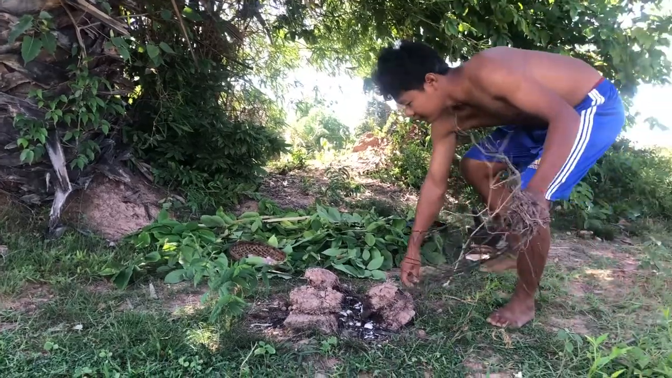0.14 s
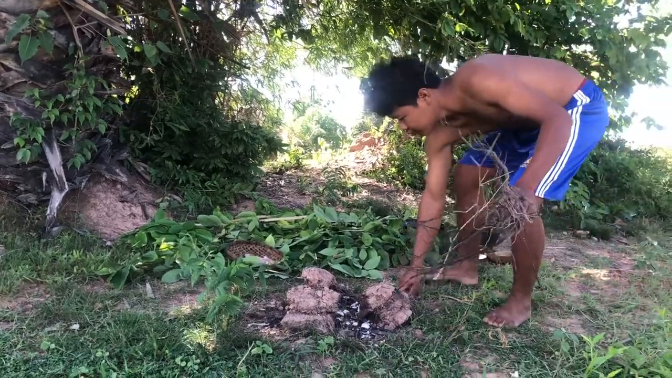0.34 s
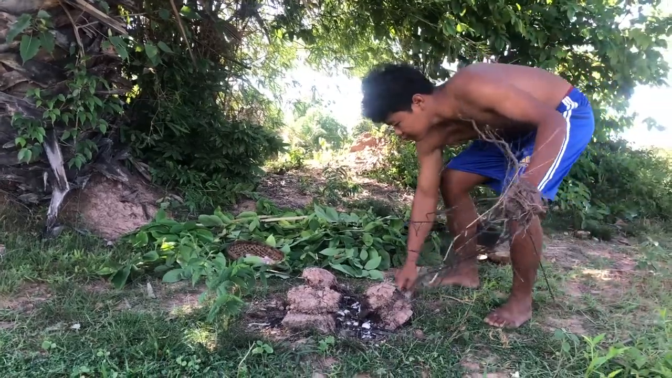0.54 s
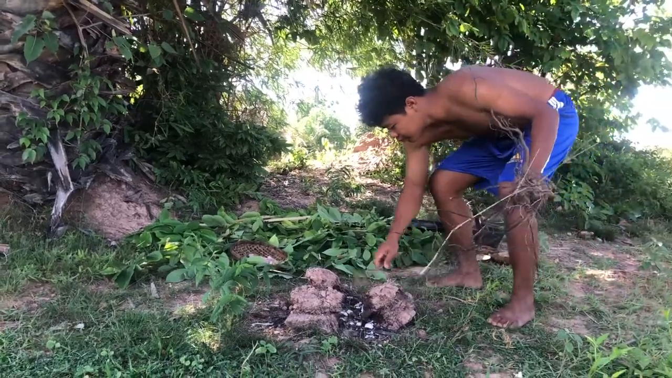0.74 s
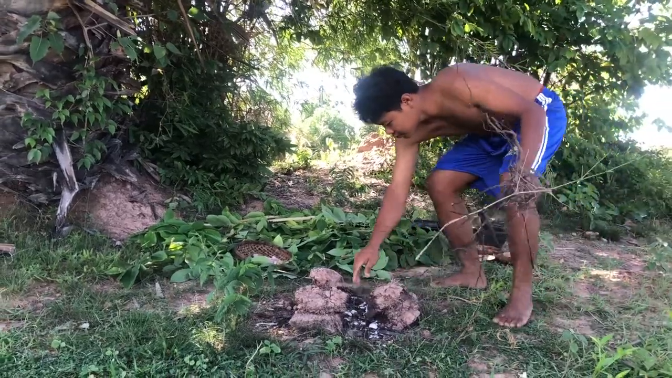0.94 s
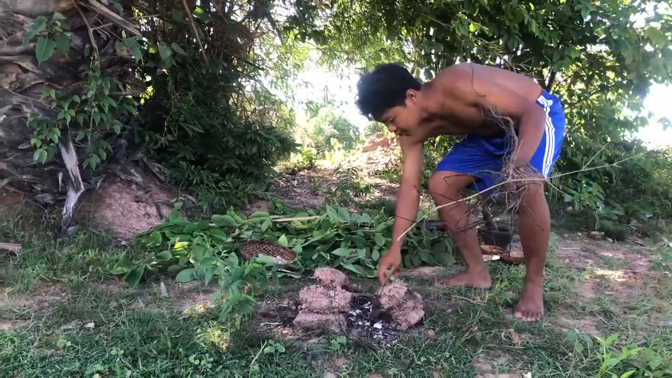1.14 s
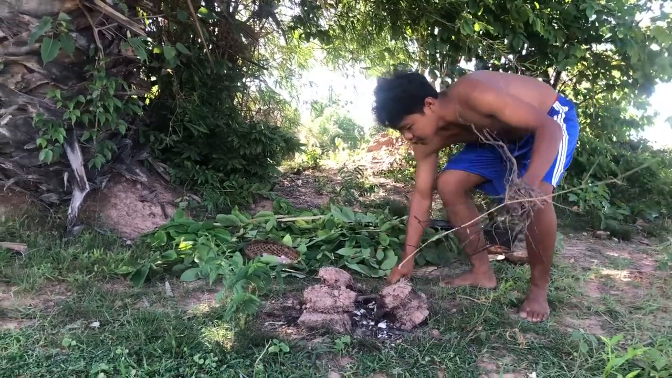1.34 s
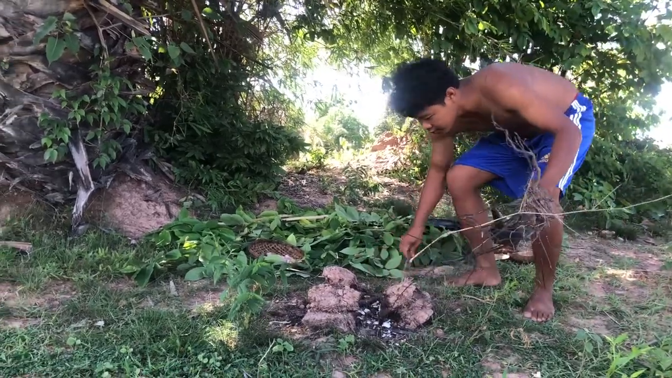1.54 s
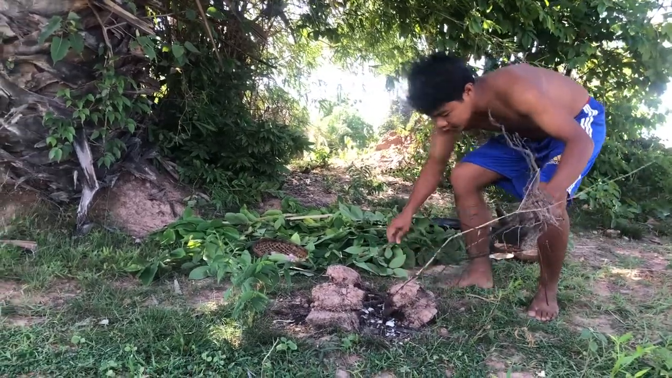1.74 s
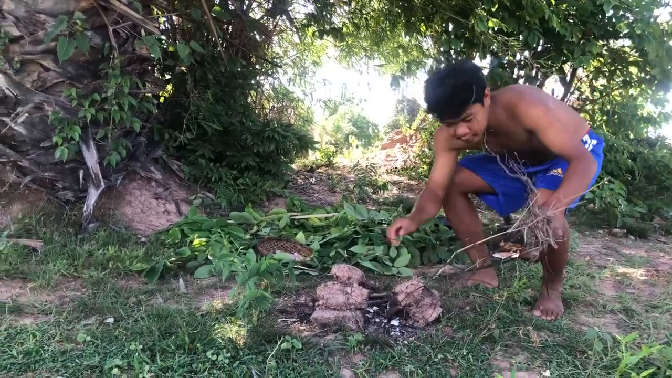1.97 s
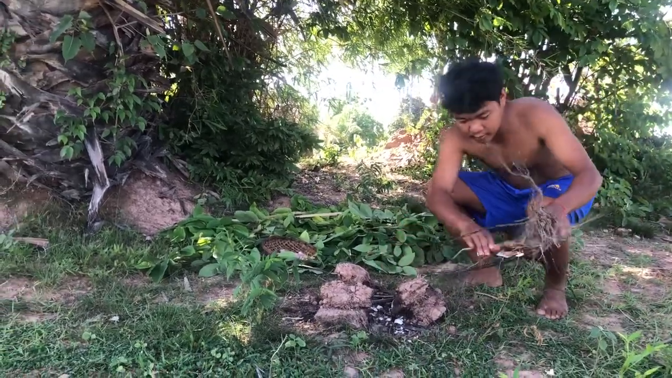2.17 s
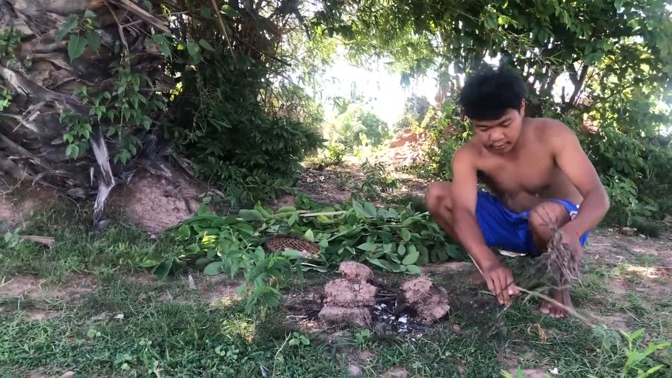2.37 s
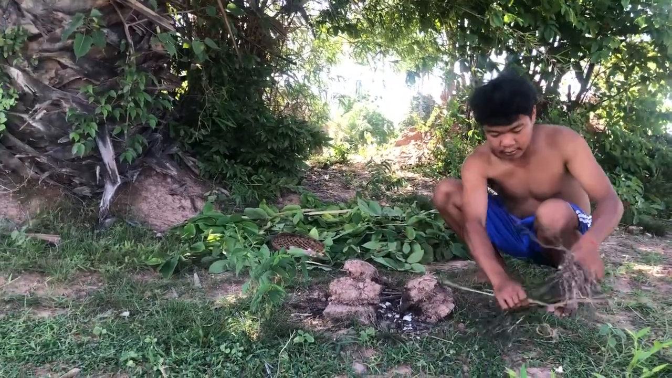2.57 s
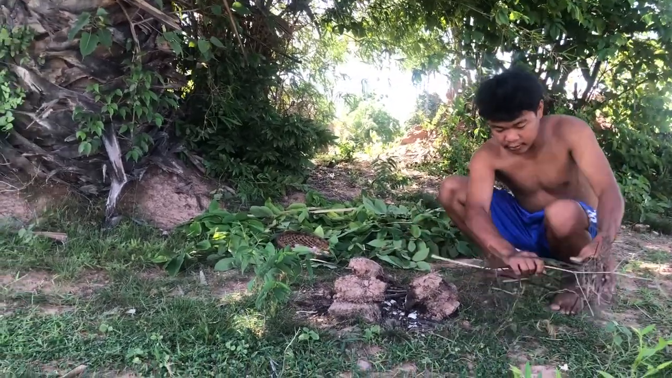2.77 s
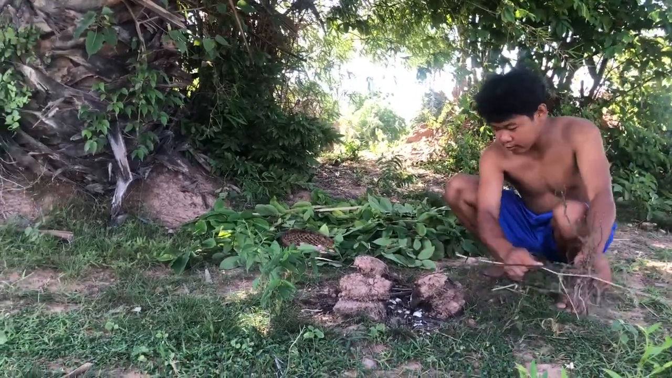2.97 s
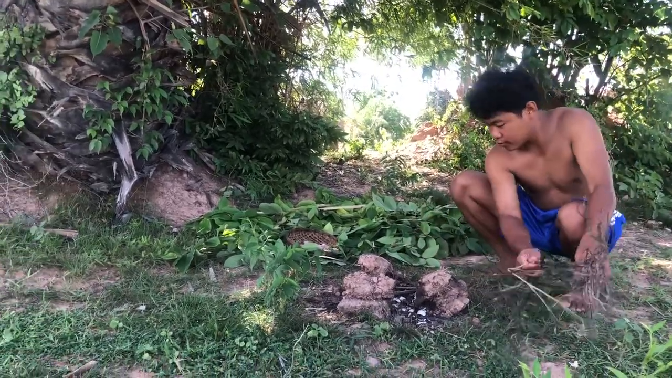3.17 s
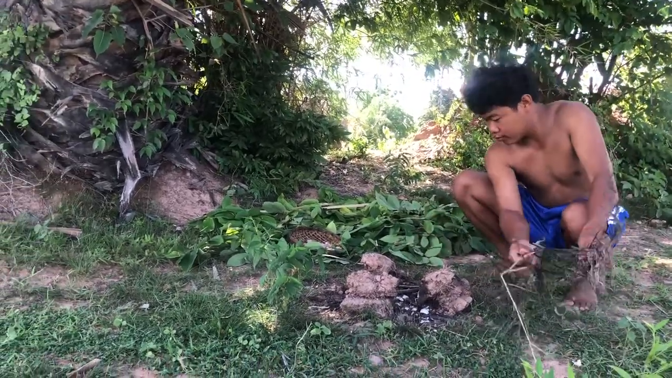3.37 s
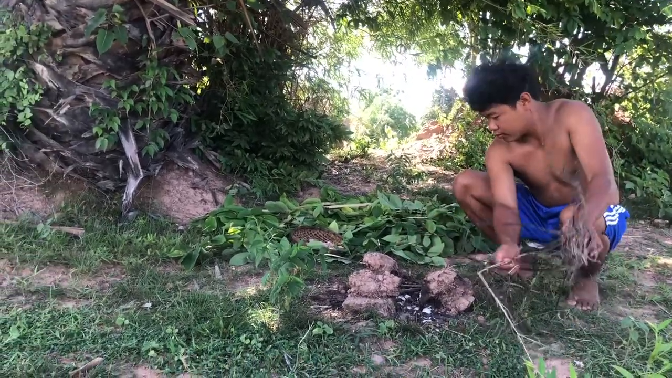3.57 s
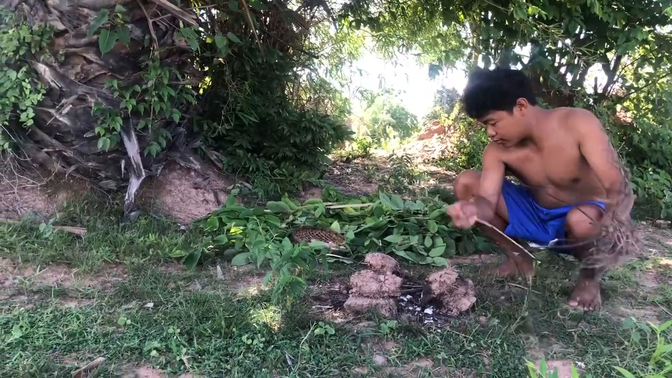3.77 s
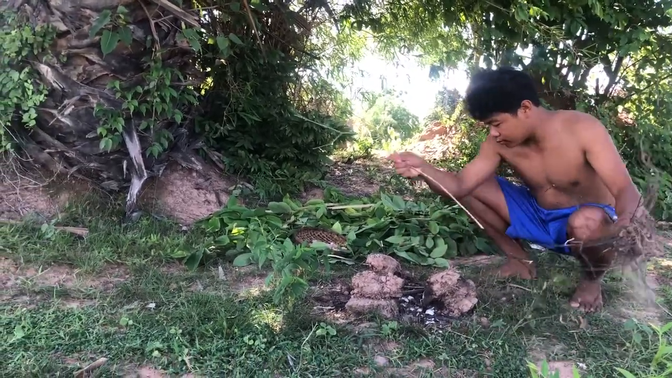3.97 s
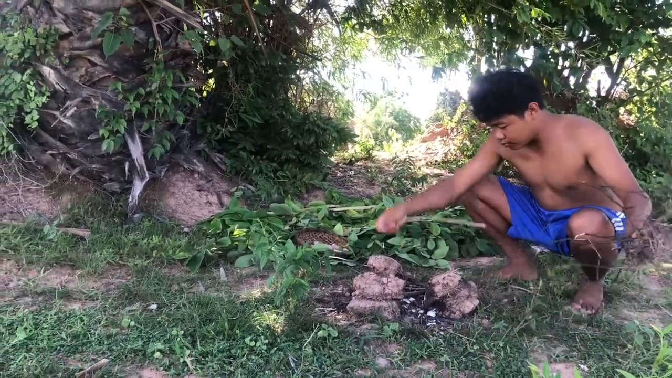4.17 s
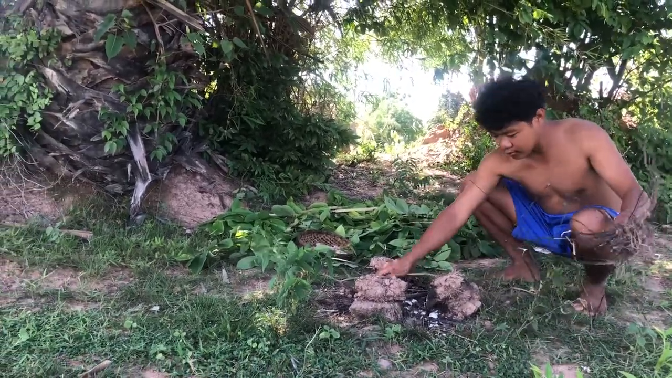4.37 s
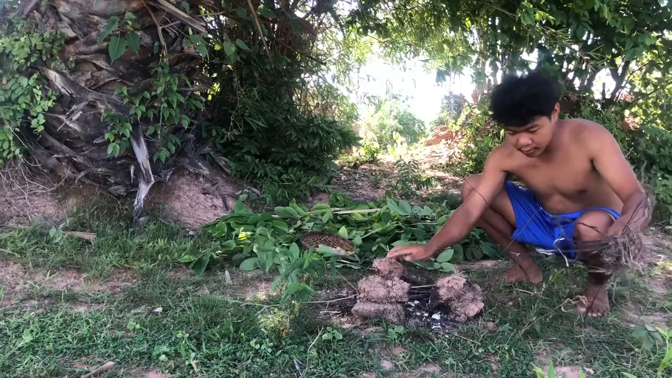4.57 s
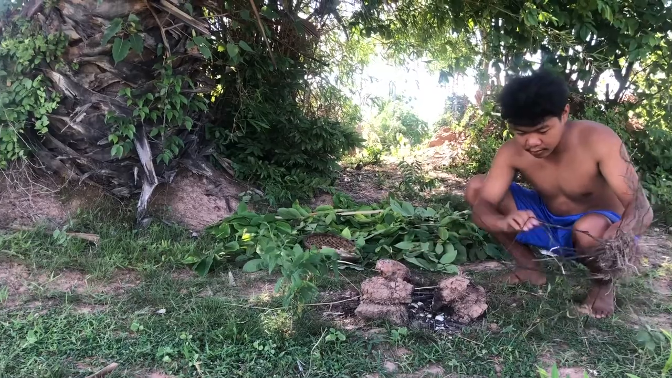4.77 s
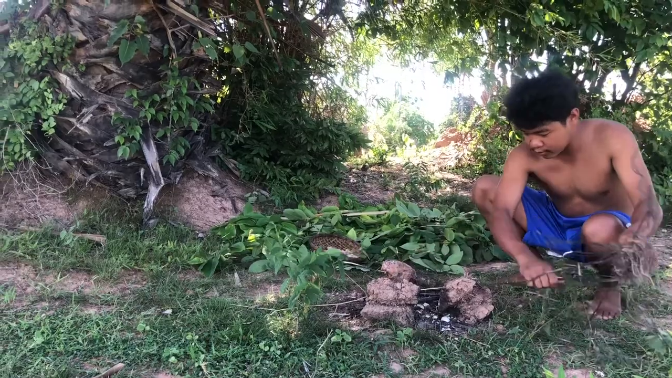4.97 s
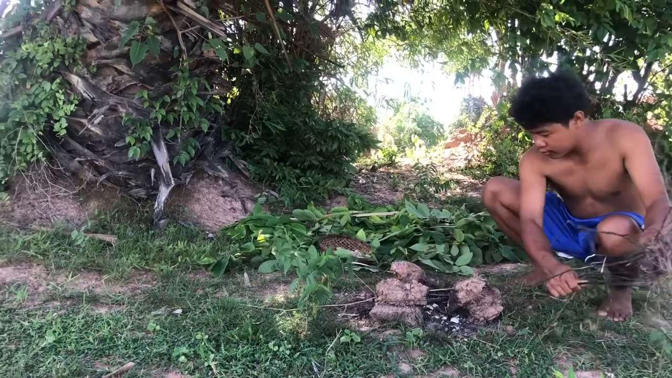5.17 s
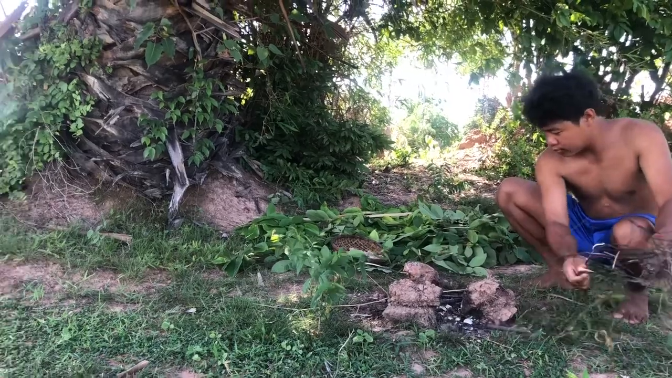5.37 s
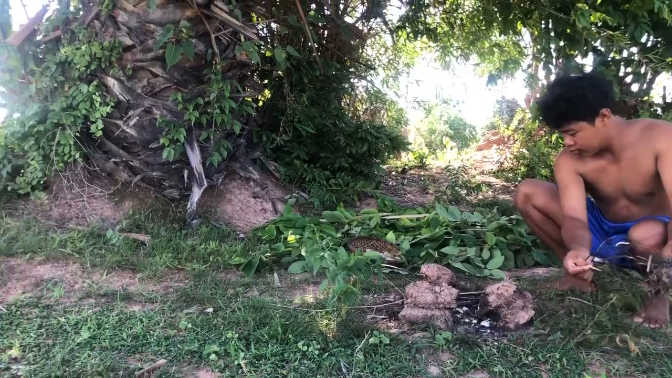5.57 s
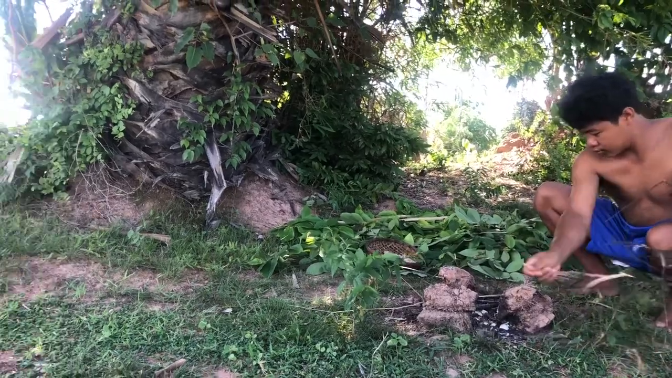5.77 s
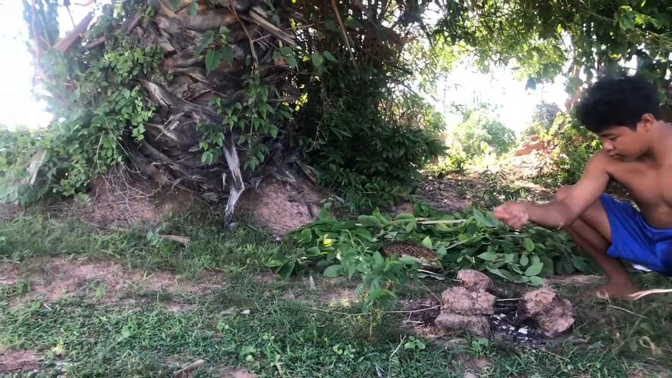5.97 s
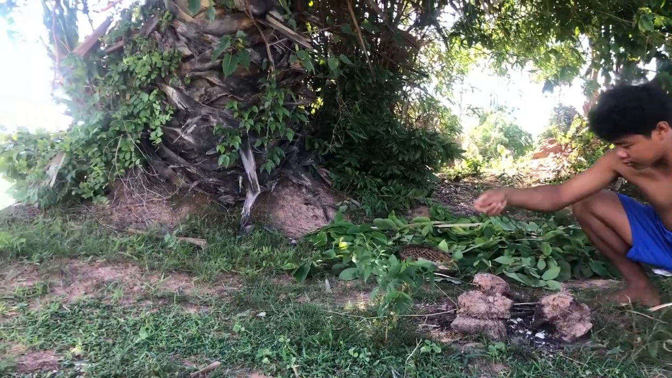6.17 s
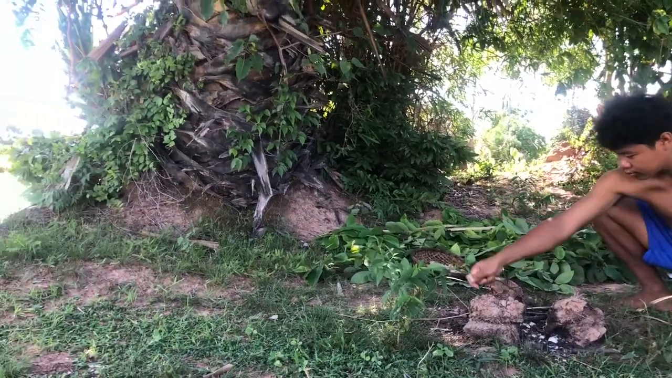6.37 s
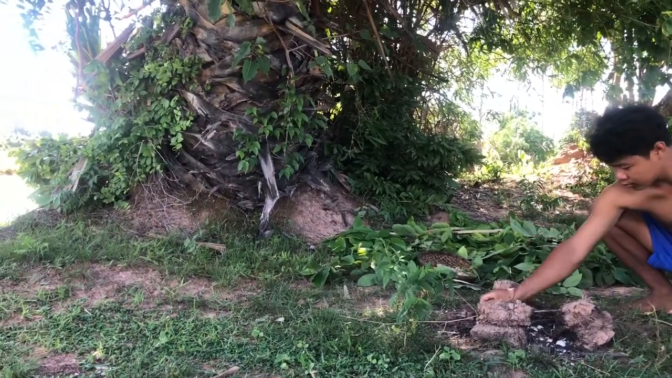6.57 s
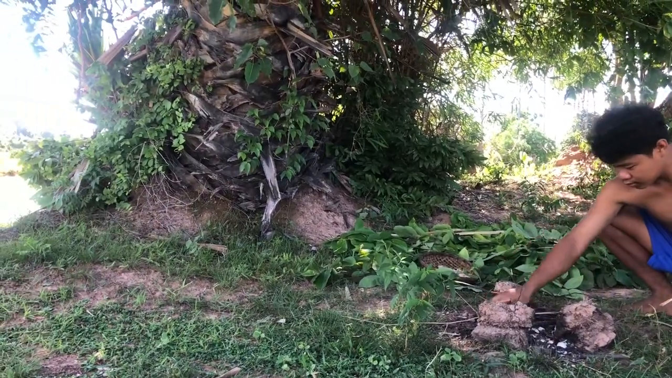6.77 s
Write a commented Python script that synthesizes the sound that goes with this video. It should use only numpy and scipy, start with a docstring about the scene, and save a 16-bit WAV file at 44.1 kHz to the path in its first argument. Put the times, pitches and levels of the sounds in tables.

```python
"""Outdoors by a small stone fireplace, someone crouching handles a bundle of dry twigs and breaks sticks from it.
A low rumble and hum, airy hiss and leaf ticks run throughout, coloured noise with drifting gains; a far rush
dies down early. Grips and pulls soon make the bundle crackle, many tiny slips, and set off snaps, short torn
noise bursts. Ringing sticks tap the stones, thin chirps and damped thuds come between, and faint hoots,
narrow noise, come in later. More soft thuds follow, and one gust swells the wind near the end."""
import sys
import numpy as np
from scipy import signal
from scipy.fft import rfft, irfft, next_fast_len
from scipy.io import wavfile
from scipy.ndimage import uniform_filter1d, map_coordinates

SR = 44100
rng = np.random.default_rng(int(sys.argv[2]) if len(sys.argv) > 2 else 0)


def wav_record(signal):
    """Record a signal, one row per channel, as 16-bit PCM in the file named by sys.argv[1]."""
    frames = np.transpose(np.atleast_2d(signal))
    bounded = np.clip(frames, -1, 1)
    # unit amplitude maps onto the largest positive 16-bit level
    quanta = np.round(bounded * 32767).astype(np.int16)
    wavfile.write(sys.argv[1], SR, quanta)


N = 300321

# grips and pulls on the bundle, levels ahead of the layer trims:
# start_s, length_s, thin_twig_crackle_db, thick_wood_creak_db
BUNDLE_PULLS = [(0.579, 0.053, -68, -59), (0.739, 0.0052, -41, -44), (1.01, 0.0044, -48, -52.5),
                (1.236, 0.043, -65, -66), (1.476, 0.069, -64.5, -63), (1.927, 0.019, -58, -54.5),
                (2.208, 0.078, -49.5, -53), (2.338, 0.018, -54, -53.5), (2.593, 0.12, -53, -55.5),
                (2.834, 0.0069, -48, -48), (3.015, 0.015, -48, -51), (3.038, .03, -41.5, -50),
                (3.128, 0.081, -37, -45), (3.222, 0.088, -49, -55.5), (3.372, 0.0093, -53.5, -59),
                (3.402, 0.061, -49, -52), (3.558, 0.052, -45, -52), (3.601, 0.16, -43.5, -47),
                (3.791, 0.011, -50, -48), (3.832, 0.054, -49, -47.5), (3.928, 0.016, -53, -58),
                (4.031, 0.03, -61, -56), (4.17, 0.018, -59, -77), (4.287, .05, -57, -58.5),
                (4.438, .02, -57, -63), (4.946, 0.021, -48.5, -62), (5.004, 0.038, -41, -53),
                (5.218, 0.0597, -52.5, -56.5), (5.329, 0.0622, -30.5, -48), (5.452, 0.034, -53, -72),
                (5.481, 0.039, -35.5, -50.5), (5.707, 0.033, -42.5, -46), (5.766, .04, -40, -45),
                (5.906, 0.018, -48.5, -57), (5.982, 0.048, -53, -55), (6.277, 0.016, -77, -60),
                (6.484, 0.048, -61, -61), (6.68, 0.024, -78, -59)]
# relative spectrum of wood bending or being struck: frequency_hz, density_db (per Hz)
BENDING_SPECTRUM = [(250, -9.5), (700, -6), (1200, -10.5), (2000, -2.5), (2800, -4), (4200, 0), (6200, -4),
                    (9000, -16.5), (16000, -42)]


def amp(db):
    """Decibels to gain."""
    return 10 ** (np.asarray(db) / 20)


def unit(x):
    """Scale to rms 1."""
    return x / np.sqrt(np.mean(x ** 2) + 1e-20)


def along(points, hz):
    """Read (frequency_hz, value) points on a log frequency axis."""
    f, v = np.transpose(points)
    return np.interp(np.log(hz + 1), np.log(f + 1), v)


def noise():
    """White noise for the whole scene."""
    return rng.standard_normal(N)


def wobble(rate):
    """A smooth random curve with this many knots a second."""
    knots = rng.standard_normal(int(N * rate / SR) + 4)
    return map_coordinates(knots, [np.arange(N) * rate / SR])


def filtered(x, response):
    """Multiply the spectrum of x by a function of frequency."""
    m = next_fast_len(N + 8192)
    return irfft(rfft(x, m) * response(np.fft.rfftfreq(m, 1 / SR)), m)[:N]


def coloured(x, spectrum):
    """Give x a spectrum, at rms 1."""
    return unit(filtered(x, lambda hz: amp(along(spectrum, hz))))


def narrow(centre_hz, width):
    """Noise in one resonance, at rms 1; width in Hz."""
    return unit(filtered(noise(), lambda hz: 1 / (1 + ((hz - centre_hz) / width) ** 2)))


def causal(db):
    """Minimum-phase impulse response of a spectrum in dB, made by folding its cepstrum."""
    cepstrum = irfft(np.log(amp(db)))
    half = len(cepstrum) // 2
    folded = np.r_[cepstrum[0], 2 * cepstrum[1:half], np.zeros(half)]
    return irfft(np.exp(rfft(folded)))


def add(track, s, sound):
    """Mix a sound into the track at time s."""
    part = track[round(s * SR):][:len(sound)]
    part += sound[:len(part)]


def patchy(x, depth_db, bands_size, frames_size):
    """Give x a random gain that drifts over frequency and time, at rms 1."""
    z = signal.stft(x, nperseg=256)[2]
    field = uniform_filter1d(rng.standard_normal(z.shape), bands_size, 0)
    field = uniform_filter1d(field, frames_size, 1)
    return unit(signal.istft(z * amp(depth_db * unit(field)), nperseg=256)[1][:N])


def grains(rate, spread_db, hiss, shift_db=3):
    """Tiny slips of uneven size over a smooth rubbing noise; their resonances shift as the contacts move."""
    sizes = amp(spread_db * np.clip(noise(), -2, 2))
    slips = sizes * (rng.random(N) < rate / SR)
    t = np.arange(2 ** 8) / SR
    scratch = t * amp(-120 * t / .0045)  # power of one slip
    power = np.abs(signal.fftconvolve(slips ** 2, scratch)[:N])
    rub = unit(np.sqrt(power) * noise()) + hiss * noise()
    return patchy(rub, shift_db, bands_size=4, frames_size=6)


def rumble(level_db=-59.0):
    """Low outdoor rumble: noise weighted to the bass, with slowly shifting bands."""
    # relative spectrum: frequency_hz, density_db (per Hz)
    rumble_spectrum = [(20, -50), (45, -2.5), (80, -2.5), (130, -3.5), (175, -6.5), (260, -6.5), (400, -12),
                       (720, -13.5), (1000, -17), (1600, -49), (2600, -72)]
    shifting = patchy(noise(), 1, bands_size=1, frames_size=20)
    return amp(level_db) * coloured(shifting, rumble_spectrum)


def wind(level_db=-66):
    """Wind on the microphone: wavering deep noise with one gust swelling it near the end."""
    # relative spectrum: frequency_hz, density_db (per Hz)
    wind_spectrum = [(15, -56), (30, -26), (45, -5.5), (65, -5.5), (100, -5.5), (200, -42)]
    gust_s, gust_width_s, gust_rise_db = 6.6, 0.47, 8
    t = np.arange(N) / SR
    gust_db = gust_rise_db * np.exp(-((t - gust_s) / gust_width_s) ** 2)
    return amp(level_db + gust_db + 2 * wobble(4)) * coloured(noise(), wind_spectrum)


def hum(level_db=-66):
    """A wavering low hum: noise in a narrow resonance."""
    return amp(level_db + wobble(3)) * narrow(87, width=4)


def air(level_db=-60.5):
    """Broad airy hiss whose level and bands drift slightly."""
    # relative spectrum: frequency_hz, density_db (per Hz)
    air_spectrum = [(500, -12), (1050, -8), (1400, -1.5), (1900, -4.5), (2800, -7.5), (4400, -6.5),
                    (7500, -11.5), (9000, -13), (12000, -15), (15500, -12.5)]
    shifting = patchy(noise(), 1, bands_size=5, frames_size=16)
    return amp(level_db + 0.19 * wobble(8.7)) * coloured(shifting, air_spectrum)


def leaves(level_db=-71.5):
    """Leaves tick in the moving air: sparse bright slips over a little hiss."""
    # relative spectrum: frequency_hz, density_db (per Hz)
    leaf_spectrum = [(800, -18), (2200, 16), (5500, 2.5), (8500, 9), (15500, -1.5)]
    ticks = grains(rate=60, spread_db=3.5, hiss=.3)
    return amp(level_db + 3 * wobble(7)) * coloured(ticks, leaf_spectrum)


def drone():
    """A far, blurred drone: resonant noise whose level wavers about a slow curve."""
    # centre line of the level: time_s, level_db
    drone_levels = [(0, -74), (2.4, -70), (3.6, -67.5), (4.25, -77), (4.7, -67), (6.81, -67.5)]
    level_db = np.interp(np.arange(N) / SR, *np.transpose(drone_levels))
    return amp(level_db + 2.3 * wobble(12)) * narrow(628, width=170)


def rush(level_db=-67, end_s=1.59, fade_s=.3, drop_db=9):
    """A far rush: wavering resonant noise that dies down early on."""
    t = np.arange(N) / SR
    lull_db = drop_db * np.clip((t - end_s) / fade_s, 0, 1)
    return amp(level_db - lull_db + 2 * wobble(12)) * narrow(1100, width=240)


def outdoors():
    """The background: steady layers with the far chirps and hoots."""
    steady = rumble() + wind() + hum() + air() + leaves() + drone() + rush()
    return steady + hoots() + chirps()


def pull_shape(t, length):
    """Gain of one pull at times t from its start: it builds, holds, lets go and settles."""
    grip_db_per_s, release_db_per_s = 1250, 480
    settle_db, settle_db_per_s = -11.5, 134  # the twigs go on settling after the release
    before, after = np.maximum(-t, 0), np.maximum(t - length, 0)
    release = -release_db_per_s * after
    settling = settle_db - settle_db_per_s * after
    return amp(np.maximum(release, settling) - grip_db_per_s * before)


def bundle(crackle_db=-1, bending_db=-1.2, stir_bending_db=-1):
    """Thin twigs crackle and thicker ones creak with every pull, and stir faintly at times in the hand."""
    # faint shifts of the bundle, levels ahead of the layer trims: start_s, end_s, level_db
    stir_spans = [(0, .35, -66), (2.3, 3.45, -62), (3.905, 4.555, -67), (4.87, 5.586, -61.5),
                  (6.075, 6.454, -71)]
    # relative spectrum of thin twigs: frequency_hz, density_db (per Hz)
    crackle_spectrum = [(1500, -42), (4000, -11.5), (7800, -3), (10000, 3), (13000, 3.5), (15400, 8.5),
                        (16300, -71)]
    t = np.arange(N) / SR
    stirring = sum(amp(db) * ((t > start) & (t < end)) for start, end, db in stir_spans)
    fine = uniform_filter1d(stirring, size=2 ** 12) * amp(1 * wobble(12))
    coarse = amp(stir_bending_db) * fine
    for s, length, fine_db, coarse_db in BUNDLE_PULLS:
        shape = pull_shape(t - s, length)
        fine = np.hypot(fine, amp(fine_db) * shape)
        coarse = np.hypot(coarse, amp(coarse_db) * shape)
    slips = grains(rate=600, spread_db=4, hiss=.55, shift_db=3)
    crackle = amp(crackle_db) * fine * coloured(slips, crackle_spectrum)
    creak = amp(bending_db) * coarse * coloured(slips, BENDING_SPECTRUM)
    return crackle + creak


def chirps(length=0.037, relative_width=0.13):
    """Short blurred peeps from the trees: resonant noise under a smooth swell."""
    # thin far chirps; each swell begins 8 ms ahead of its time: time_s, level_db, pitch_hz
    chirp_rows = [(.13, -57, 1000), (.65, -58, 7500), (.674, -48, 5500), (1.125, -58, 1200),
                  (1.405, -59, 6960), (1.485, -58.5, 1080), (1.525, -58, 7100), (2.441, -60, 6900),
                  (6.405, -60, 5560)]
    out, swell = np.zeros(N), np.hanning(int(length * SR))
    for s, db, hz in chirp_rows:
        add(out, s - .008, amp(db) * swell * narrow(hz, relative_width * hz)[:len(swell)])
    return out


def thuds(rise=0.0011, scuff=0.53):
    """A soft contact gives one damped push and a dull scuff around the same pitch."""
    # soft bumps; t60 is that of the scuff, the push dies twice as fast:
    # start_s, level_db, pitch_hz, t60_s
    thud_rows = [(0.484, -46, 54.3, 0.18), (1.924, -48, 560, 0.11), (2.085, -45.5, 480, 0.09),
                 (2.355, -50, 450, 0.093), (3.426, -50, 500, 0.13), (6.069, -46, 45.4, 0.41),
                 (6.208, -40.5, 415, 0.079), (6.516, -33.5, 176, 0.066), (6.522, -33.5, 72, 0.4),
                 (6.564, -36, 198, 0.14), (6.598, -41, 132, 0.21), (6.625, -47, 282, 0.1)]
    out, t = np.zeros(N), np.arange(SR // 3) / SR
    for s, db, hz, t60 in thud_rows:
        fade = amp(-60 * t / t60)
        push = np.sin(2 * np.pi * hz * t) * fade
        body = push + scuff * narrow(hz, min(hz, 130))[:len(t)]
        add(out, s, amp(db) * body * (1 - np.exp(-t / rise)) * fade)
    return out


def fibres(count=12, rate=70, over_crackle_db=2, spread_db=6.5, mean_tilt=0.096):
    """Small snaps at random moments of each pull, louder the harder it is: (time_s, level_db, tilt) rows."""
    rows = []
    for s, length, crackle_db, _ in BUNDLE_PULLS:
        delays = (np.arange(count) + rng.random(count)) / rate
        for delay, (size, colour) in zip(delays, rng.standard_normal((count, 2))):
            if delay < length:
                level_db = crackle_db + over_crackle_db + spread_db * min(size, 1)
                rows.append((s + delay, level_db, mean_tilt + 3 * colour))
    return rows


def snaps(scatter_db=-28, scatter_t60=0.17):
    """Fibres start to give, tear in milliseconds and briefly ring a twig with resonances of its own."""
    # twigs breaking, level as if packed into one millisecond:
    # time_s, level_db, brightness_db_per_octave
    break_rows = [(0.7347, -28, -5.5), (1.923, -40, -10), (2.2058, -37, -9), (2.2145, -39.5, -4),
                  (2.248, -35, -6.5), (2.263, -31.5, 0), (2.8348, -23, -5.5), (2.978, -33.5, -7.5),
                  (3.058, -46, 4), (3.0983, -22.5, -1.5), (3.1187, -30, -1), (3.1344, -21, 9),
                  (3.141, -16.5, 3), (3.1445, -13.5, -1), (3.1467, -20, -2), (3.2225, -21.5, -4.5),
                  (3.269, -28.5, -1.5), (3.4039, -36, -5.5), (3.569, -43, -2), (3.6018, -31, -4),
                  (3.6341, -22.5, -4), (3.6514, -32, 4), (3.797, -37.5, 0), (3.8463, -36, -9.5),
                  (3.8864, -34, -5), (4.2938, -44, 3), (4.309, -39.5, -5), (5.0302, -24, 6),
                  (5.1267, -37.5, 7), (5.226, -33, 2), (5.2601, -10.5, -1.5), (5.2714, -25, 7),
                  (5.298, -18.5, 6), (5.3148, -15, 2), (5.3236, -18, 2), (5.3273, -18.5, 0.5),
                  (5.3407, -9, 2), (5.3518, -26, -1), (5.3639, -14, 1), (5.3659, -18, -3), (5.3745, -21, 4),
                  (5.3824, -28, -3), (5.3976, -20.5, 4), (5.4105, -25, 4), (5.48, -18.5, 1),
                  (5.5077, -37, 9), (5.7032, -37, -12), (5.7801, -27, -5), (5.8064, -36, -2.5),
                  (5.909, -35, 7), (6.52, -41, 5)]
    # relative spectrum of a break: frequency_hz, density_db (per Hz)
    fracture_spectrum = [(300, -38), (1000, -24.5), (2000, -14), (2800, -9), (4300, -2), (6500, -1.5),
                         (8000, -7.5), (10500, 4.5), (13000, 3), (15500, 9), (17000, -40)]
    lead = 2 ** 7  # samples ahead of the tear
    lead_db, lead_t60, ring_db, ring_t60 = -20, .005, -16, .024
    tear_t60 = .0048  # s, for a hard break
    out, t = np.zeros(N), (np.arange(2 ** 12) - lead) / SR
    hz = np.fft.rfftfreq(len(t), 1 / SR)
    away, torn = np.abs(t), t >= 0
    giving = amp(lead_db - 60 * away / lead_t60)
    ring = amp(ring_db - 60 * away / ring_t60)
    for s, db, tilt in [*break_rows, *fibres()]:
        # a hard break is over at once, a weak one frays for longer
        fray = np.interp(db, [-40, -20], [2.6, 1])
        tear = amp(-60 * away / (fray * tear_t60))
        fade = np.where(torn, tear + ring, giving)
        ripple = unit(uniform_filter1d(rng.standard_normal(len(hz)), size=50))
        colour = along(fracture_spectrum, hz) + tilt * np.log2((hz + 500) / 10000)
        burst = fade * rng.standard_normal(len(t))
        crack = signal.fftconvolve(burst, causal(colour + 2 * ripple))[:len(t)]
        # energy of one millisecond at rms 1
        crack = unit(crack) * np.sqrt(SR / 10 ** 3 / len(t))
        # the jolt shivers on through the neighbouring twigs
        rustle = unit(irfft(rfft(rng.standard_normal(len(t))) * amp(colour)))
        shiver = rustle * torn * amp(scatter_db - 60 * away / scatter_t60)
        add(out, s - lead / SR, amp(db) * (crack + shiver))
    return out


def taps(level_db=-4, tick=1.64):
    """A loose stick rings in its bending modes when it meets a stone, with a short noisy tick."""
    # sticks touching stone, ahead of the level_db trim: start_s, level_db
    tap_rows = [(.6785, -54), (.7345, -48), (1.0012, -38), (1.0075, -47), (1.924, -51), (2.458, -55),
                (5.728, -50), (5.778, -50), (6.113, -54), (6.498, -57), (6.69, -54)]
    # bending modes, levels scattered afresh for each tap: frequency_hz, level_db, t60_s
    stick_modes = [(1120, -7, 0.076), (2023, -1, 0.062), (2410, -12, 0.051), (2980, -2, 0.04),
                   (3500, 0.5, 0.043), (4380, -5, 0.041), (6400, -2, 0.064)]
    out, t = np.zeros(N), np.arange(SR // 6) / SR
    contact = amp(-60 * t / .022)
    for s, db in tap_rows:
        ring = np.zeros(len(t))
        for hz, mode_db, t60 in stick_modes:
            fade = amp(mode_db + 2 * rng.standard_normal() - 60 * t / t60)
            ring += fade * np.sin(2 * np.pi * hz * t + rng.uniform(0, 2 * np.pi))
        scrape = contact * coloured(noise(), BENDING_SPECTRUM)[:len(t)]
        add(out, s, amp(db + level_db) * (ring + tick * scrape))
    return out


def hoots(width=22):
    """Soft blurred notes that swell and fade: noise in a narrow resonance."""
    # hoots far off, perhaps a dove: start_s, length_s, level_db, pitch_hz
    hoot_rows = [(1.925, .25, -65.5, 570), (2.243, .36, -65.5, 617), (2.927, 0.19, -65, 582),
                 (3.374, 0.15, -63.5, 590), (3.674, 0.13, -70, 600)]
    out = np.zeros(N)
    for s, length, db, hz in hoot_rows:
        swell = signal.windows.tukey(int(length * SR), .6)
        add(out, s, amp(db) * swell * narrow(hz, width)[:len(swell)])
    return out


def grove(x):
    """Ground, trunks and leaves scatter a short diffuse tail, each band fading at its own pace."""
    # decay of the tail: frequency_hz, t60_s
    grove_decay = [(200, 0.067), (2000, 0.48), (6000, 0.38), (15000, 0.19)]
    hz, t, z = signal.stft(rng.standard_normal(SR // 3), SR, nperseg=256)
    fade = amp(-60 * t / along(grove_decay, hz)[:, None])
    tail = signal.istft(z * fade, SR, nperseg=256)[1]
    delayed = np.pad(x, (SR // 300, 0))
    return signal.fftconvolve(delayed, tail / np.linalg.norm(tail))[:N]


def scene(wet_db=-16):
    """The twigs, their scattered answer, the thuds and the background."""
    wood = snaps() + bundle() + taps()
    return (wood + amp(wet_db) * grove(wood) + thuds() + outdoors())[None]


def record(dry):
    """Cut the deepest bass, then roll off very steeply above the band limit."""
    top_hz = 16050
    high_pass = signal.butter(4, 32, 'high', fs=SR, output='sos')
    lean = signal.sosfilt(high_pass, dry[0])
    return filtered(lean, lambda hz: 1 / np.sqrt(1 + (hz / top_hz) ** 160))[None]


dry = scene()
out = record(dry)
wav_record(out)
```